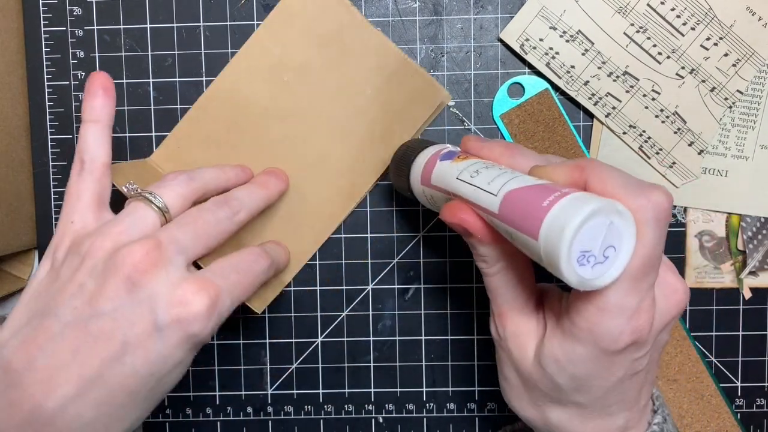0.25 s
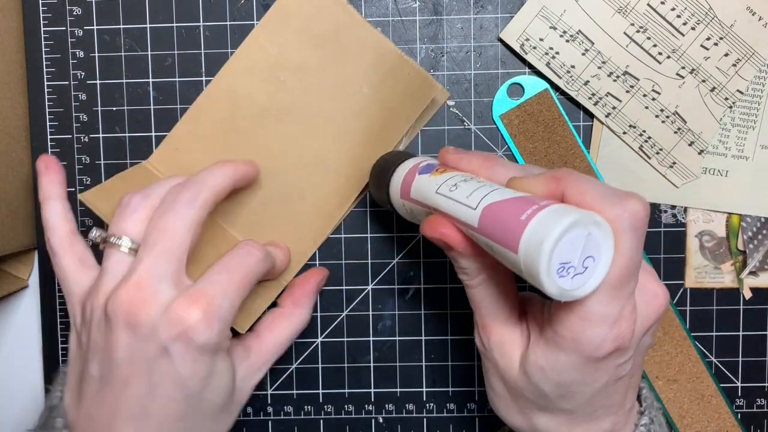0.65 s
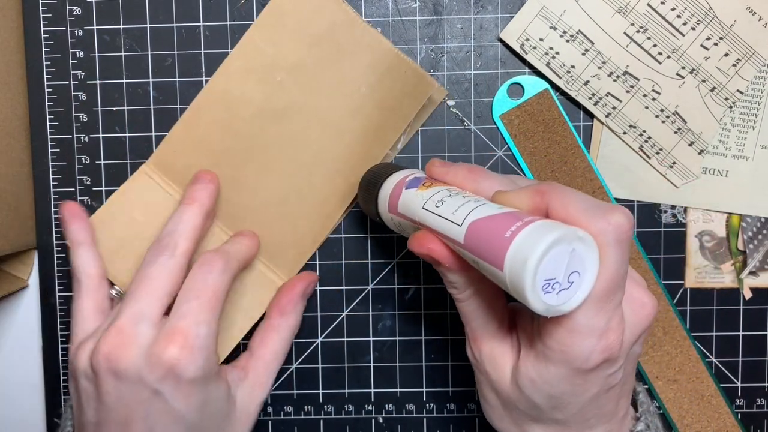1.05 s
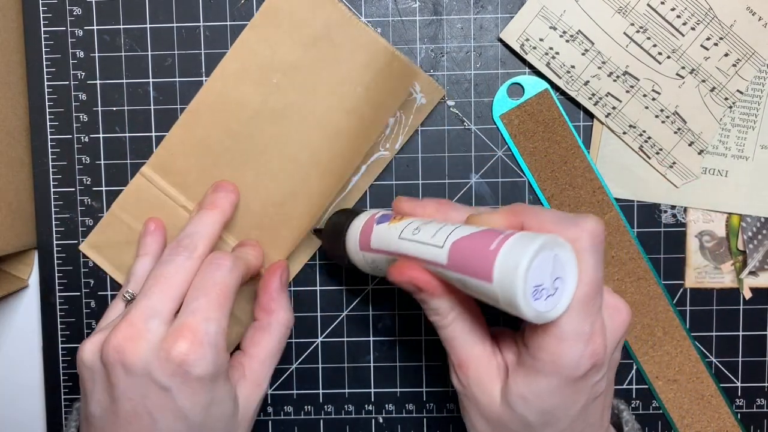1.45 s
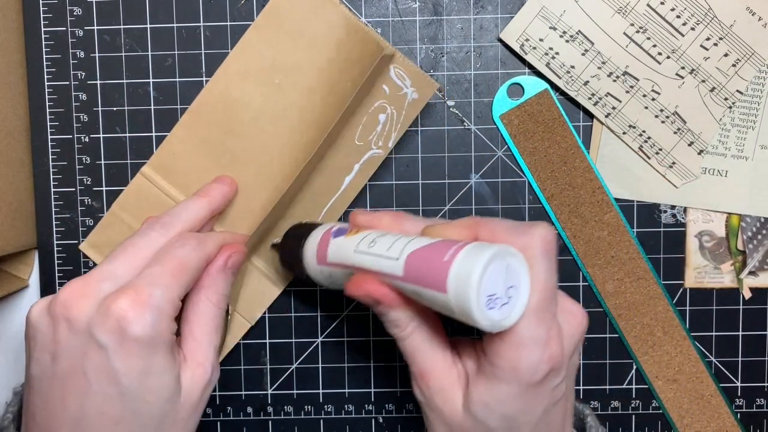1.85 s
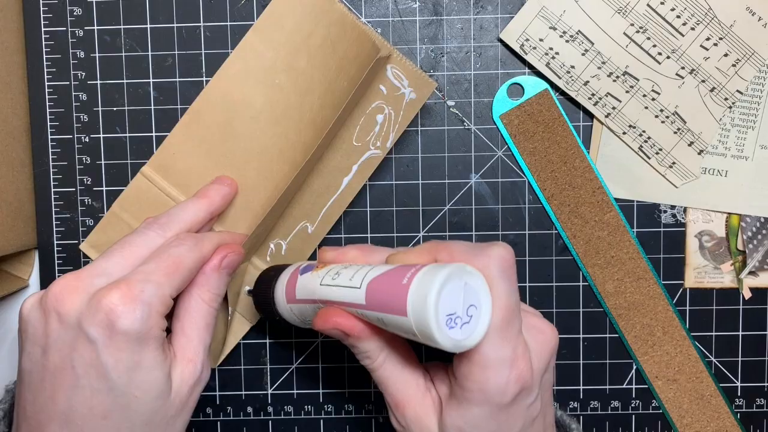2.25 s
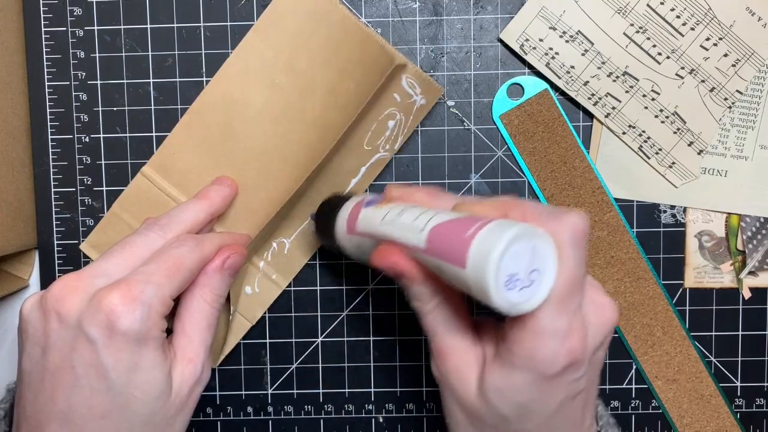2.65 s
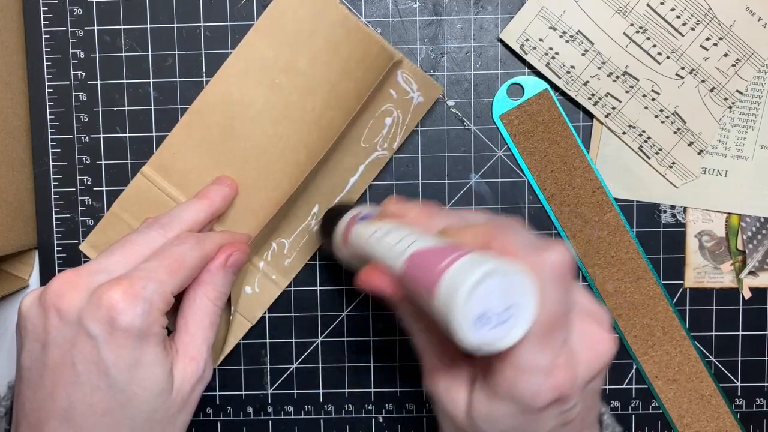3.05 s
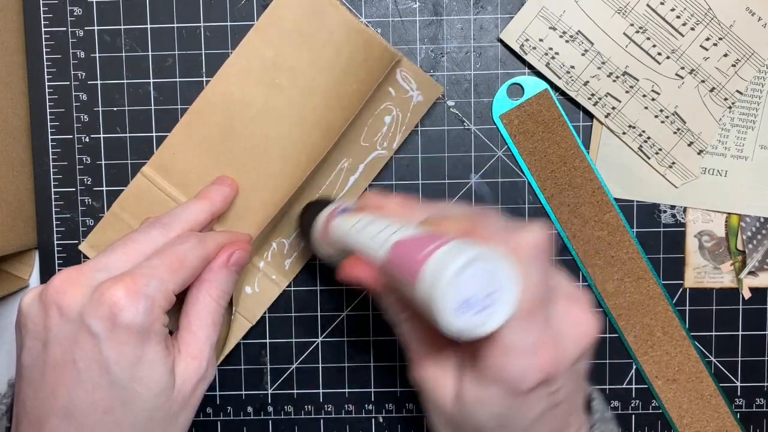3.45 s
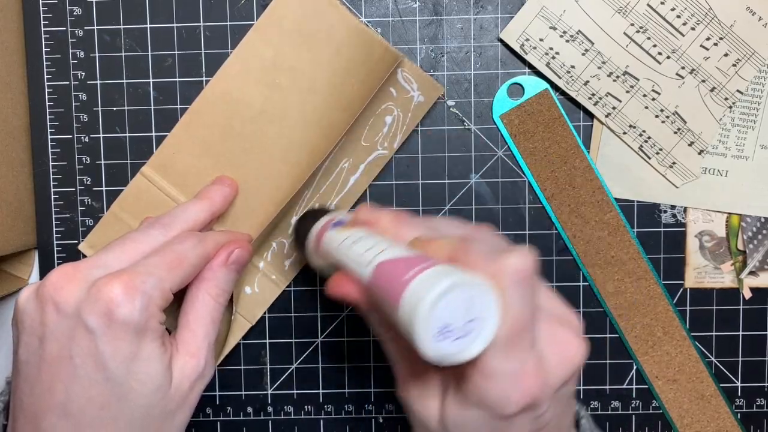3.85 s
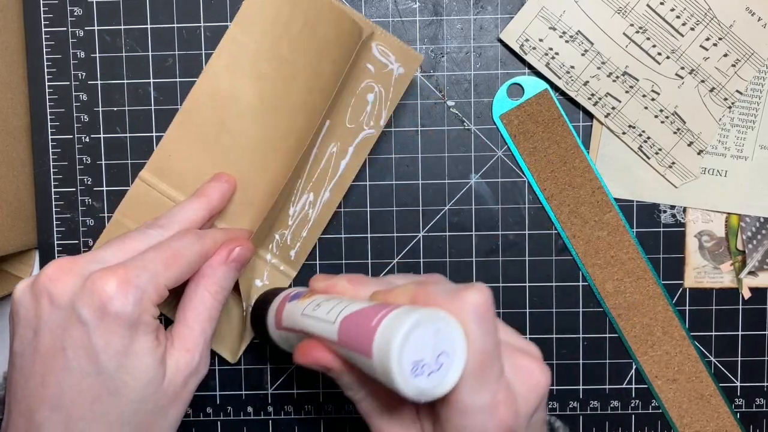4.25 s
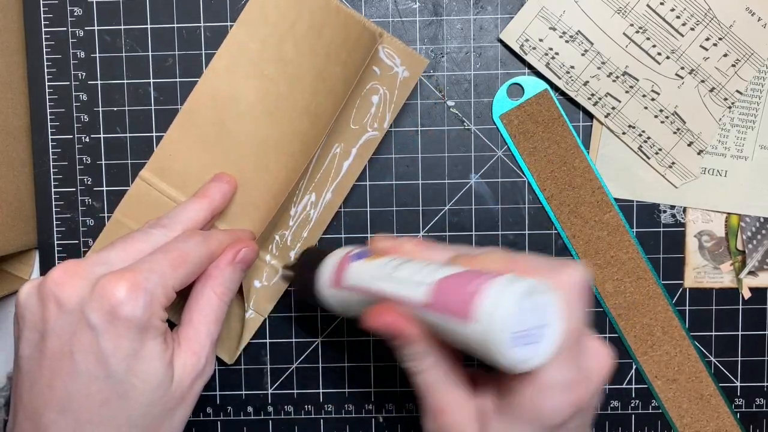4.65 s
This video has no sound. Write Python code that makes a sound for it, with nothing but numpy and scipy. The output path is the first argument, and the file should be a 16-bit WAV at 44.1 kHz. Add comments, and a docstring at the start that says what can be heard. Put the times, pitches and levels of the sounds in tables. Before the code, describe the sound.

Close, dry stereo pickup over a desk in a quiet room, with faint low rumble and slight hiss. At 0.1 s a short, bright paper swish with tiny crackles, then soft slides of a hand on a paper bag until about 1.3 s, with small creases and faint thuds near 0.6 and 0.96 s. A click at 1.4 s; at 1.65 s a sharp, bright tap with a low desk thud. Light scratchy strokes follow from 1.55 to 2.4 s. From about 2.55 s, after a soft bump, the nozzle scrubs to and fro louder, seven or eight strokes a second, grainy and mid-high, with a slight hollow bag tone. The hardest snap cracks at 3.28 s, a lesser one at 3.44 s, another duller knock at 3.93 s with a woody thud. After 4.1 s the strokes weaken, a last faint rub at 4.55 s, then room tone to about 5 s.

```python
"""At a desk in a quiet room: a glue bottle's plastic nozzle scribbles to and fro on a brown paper bag
while a hand slides and folds it. Fibres that catch and let go are random clicks that ring the sheet and
the air in the bag; creases are bursts of clicks, desk thuds decaying sines, the room shaped noise.
Two microphone ports a few centimetres apart hear it from close above."""
import sys
import numpy as np
from scipy import signal
from scipy.fft import rfft, irfft
from scipy.io import wavfile
from scipy.ndimage import uniform_filter1d

SR = 44100
rng = np.random.default_rng(int(sys.argv[2]) if len(sys.argv) > 2 else 0)


def log_audio(samples):
    """Write samples as a 16-bit WAV file to the path given in sys.argv[1]."""
    # one column per channel
    frames = np.atleast_2d(samples).T
    # limit to full scale, then quantise
    limited = np.clip(frames, -1, 1)
    pcm = np.round(limited * 32767).astype(np.int16)
    wavfile.write(sys.argv[1], SR, pcm)


N = 215798

# rings of the paper sheet: pitch_hz, width_hz, level_db (relative, before sharing out)
PAPER_RINGS = [(990, 900, -6), (1251, 700, 3.5), (1728, 220, -3.5), (2174, 392, -2.5), (2737, 615, 0.5),
               (3170, 348, 1), (3894, 1100, 3), (4400, 1800, -6)]
# rings of the air in the bag: pitch_hz, width_hz, level_db (relative, before sharing out)
BAG_RINGS = [(267, 150, -3.5), (358, 45, 0), (450, 90, -2), (590, 32, 2), (785, 55, -1), (885, 60, -1.5),
             (1030, 90, -5)]


def gain_of(db):
    """Decibels to an amplitude factor."""
    return 10 ** (np.asarray(db) / 20)


def evened(x):
    """Scales to rms 1."""
    return x / np.sqrt(np.mean(x ** 2) + 1e-20)


def read(points, hz):
    """Looks a spectrum up on a log-frequency axis."""
    f, value = np.transpose(points)
    return np.interp(np.log(hz + 1), np.log(f + 1), value)


def wander(seconds):
    """Slow random drift of rms about 1: noise at a sixteenth of the rate, smoothed twice over the given time."""
    size = round(seconds * SR / 16)
    coarse = rng.standard_normal(N // 16 + 2)
    smooth = uniform_filter1d(uniform_filter1d(coarse, size), size)
    return np.interp(np.arange(N) / 16, np.arange(len(coarse)), evened(smooth))


def room_tone():
    """Low rumble and faint hiss: two unrelated noises whose level flickers together."""
    # noise of the room: frequency_hz, level_db (per Hz)
    room_spectrum = [(20, -125), (35, -108), (55, -92), (120, -96.5), (200, -101), (300, -113), (500, -119),
                     (900, -127), (1400, -119), (3000, -124), (9000, -125), (16000, -130)]
    hz = np.fft.rfftfreq(N, 1 / SR)
    white = rfft(rng.standard_normal((2, N)))
    tone = irfft(white * gain_of(read(room_spectrum, hz)) * np.sqrt(SR / 2), N)
    return tone * gain_of(1.0 * wander(0.0346))


def strokes():
    """Each stroke speeds up and slows down along a sine arch: gains of body, fizz, sheen and boom, and the pitch."""
    # strokes of the nozzle or slides of the hand: fastest_s, speeding_up_s, slowing_down_s, friction_db,
    # fizz_db (over friction), fizz_growth_db (start to end), sheen_db (over fizz),
    # boom_db (hollow bag, over friction), sheet_pitch_hz
    stroke_rows = [ (0.002, 0.022, 0.043, -62.5, 4, -4, -0.5, -3, 2120),
                   (.075, 0.05, 0.062, -57, 2.5, -1, -4.5, 3.5, 2630),
                   (.108, 0.019, 0.086, -44.5, 6.5, -16, -5.5, -31, 3240),
                   (.2, 0.077, 0.024, -57, -3.5, 4, -0.5, 0.5, 2770),
                   (.27, 0.21, 0.076, -63, -8.5, -1, -3.5, 0, 2220),
                   (.385, 0.087, 0.051, -62, -3.5, 8, -2, -14, 2970),
                   (.46, 0.16, 0.053, -60, -2, 1, -14, -13, 2640),
                   (.54, 0.075, 0.065, -85.5, -1, 26, 4, 6.5, 2500),
                   (.592, 0.014, 0.36, -69, -1.5, -33, -8.5, -5, 2560),
                   (.715, 0.0019, 0.21, -64.5, -2, 18, 0, -11, 2960),
                   (.775, 0.095, 0.031, -59, -1.5, -6, -4, -4.5, 2920),
                   (.85, 0.024, 0.084, -65, -14, 2, -14, -10, 2960),
                   (.965, 0.036, 0.047, -64.5, -7.5, -13, 9.5, 7.5, 3040),
                   (1.07, 0.26, 0.061, -64.5, -2.5, 12, 1, -8, 2310),
                   (1.13, 0.046, 0.028, -57.5, -13, 23, 11, -14, 2370),
                   (1.2, 0.19, 0.14, -55, -8, -25, -6.5, -18.5, 2520),
                   (1.38, 0.19, 0.066, -61, -7.5, 22, -8, -16, 2280),
                   (1.49, 0.11, 0.09, -58, -17, 29, -1, -22, 2250),
                   (1.57, 0.055, 0.12, -49.5, -11.5, 12, -9, -22, 2330),
                   (1.675, 0.065, 0.052, -49.5, -3, 8, -7, 0, 2000),
                   (1.78, 0.18, 0.074, -60.5, -9.5, 0, 0, -19, 2180),
                   (1.875, 0.11, 0.066, -54.5, -10.5, 17, -7, -24.5, 2640),
                   (1.988, 0.087, 0.055, -54, -11, 21.5, -6, -22, 2530),
                   (2.062, 0.059, 0.023, -52.5, -5, -5.5, -8.5, -28.5, 3040),
                   (2.13, 0.085, 0.023, -82, -11.5, -0.5, -1.5, -11, 2700),
                   (2.215, 0.017, 0.059, -65.5, -13, 3, -2.5, -16.5, 2500),
                   (2.315, 0.072, 0.061, -53, -8.5, 7.5, -9.5, -20, 2570),
                   (2.422, 0.045, 0.072, -50.5, -4, -8, -6, -19, 2660),
                   (2.585, 0.11, 0.15, -41.5, -12, -2, -3.5, -19.5, 1970),
                   (2.785, 0.081, 0.083, -43, -7, 14, -8, -49, 2550),
                   (2.94, 0.078, 0.091, -45, -11, -9, -3, -27, 2100),
                   (2.962, 0.069, 0.05, -49.5, -4.5, 7, -10, -1.5, 1940),
                   (3.085, 0.072, 0.082, -43, -10.5, 22, -4, -27.5, 2650),
                   (3.235, 0.072, 0.15, -47.5, -3.5, -4, -4.5, -22, 2487),
                   (3.315, 0.07, 0.036, -42.5, -6, -15, -4.5, -3.5, 2270),
                   (3.436, 0.093, 0.065, -41.5, -11.5, 0, -2.5, -22.5, 2500),
                   (3.55, 0.069, 0.095, -41, -4, 10, -4.5, -18, 2450),
                   (3.705, 0.05, 0.13, -45.5, -2.5, -3, -4.5, -22.5, 2400),
                   (3.875, 0.061, 0.062, -50, -4, -10, -8, -26, 1900),
                   (3.98, 0.049, 0.033, -44.5, -7.5, 5, -2.5, 4.5, 1770),
                   (4.03, 0.035, 0.08, -49.5, -1, -22, -5, -8.5, 1700),
                   (4.118, 0.06, 0.064, -57, -8, -24, -6, -6, 2206),
                   (4.175, 0.039, 0.077, -51, -11, 23, -6.5, -18, 2400),
                   (4.278, 0.016, 0.06, -51.5, -18.5, 21, -2.5, -17.5, 2720),
                   (4.354, 0.035, 0.032, -50, -11, 0, -0.5, -16, 2450),
                   (4.4, 0.026, 0.027, -76.5, -13.5, 2, -0.5, -9, 2350),
                   (4.562, 0.024, 0.03, -57.5, -15, 0, -4, -19, 2750), ]
    settle_db, settle_s = -23.5, 0.021  # the sheet creeps on after the fastest moment and settles
    # loudness over speed: a stroke swells from a soft start and holds up longer as it slows
    swell_power, slowing_power = 2.04, 1.38
    power, t = np.zeros((4, N)), np.arange(N) / SR
    for s, rise_s, fall_s, db, fizz_db, growth_db, sheen_db, boom_db, _ in stroke_rows:
        start = max(round((s - rise_s) * SR), 0)
        span = slice(start, round((s + fall_s + 8 * settle_s) * SR))
        since = t[span] - s
        phase = np.clip(np.where(since < 0, since / rise_s, since / fall_s), -1, 1)
        speed = np.abs(np.cos(np.pi / 2 * phase))
        settling = np.exp(-np.maximum(since - fall_s, 0) / settle_s)
        creep = gain_of(settle_db) * np.where(since < 0, 0, settling)
        rub = np.maximum(speed ** np.where(since < 0, swell_power, slowing_power), creep)
        hiss_db = fizz_db + growth_db * phase / 2
        over_db = np.array([0 * phase, hiss_db, hiss_db + sheen_db, boom_db + 0 * phase])
        power[:, span] += (rub * gain_of(db + over_db)) ** 2  # overlapping strokes add in power
    centre_hz = np.interp(t, [row[0] for row in stroke_rows], [row[-1] for row in stroke_rows])
    return np.sqrt(power), centre_hz


def friction(slips_per_s=5000, spread_db=0.5, clump_db=0.5, lump_db=2.0, patchy_db=2.5, catch_db=1.5):
    """Fibres slip under the nozzle as dense random clicks of nearly equal strength, slightly clumped; the bag
    buckles in lumps."""
    gains, centre_hz = strokes()
    slips = gain_of(spread_db * np.minimum(rng.exponential(1, N), 5)) * (rng.random(N) < slips_per_s / SR)
    trains = slips * gain_of(clump_db * wander(0.006)) * rng.choice([-1., 1.], (4, N))
    trains[3] *= gain_of(lump_db * wander(.008))  # only the boom of the bag
    levelled = [evened(train) * gain for train, gain in zip(trains, gains)]
    drives = shared_out(*levelled, centre_hz, reach=0.49, air_db=-3.5, knock_db=-16.5)
    # each drive has its own patches and brief catches
    patches_db = [patchy_db * wander(0.027) + catch_db * wander(.004) for _ in drives]
    return drives * gain_of(patches_db)


def snaps(tail_db=-24, tail_s=0.015, sheen_db=-9, tear_db=6, blow=0.45):
    """A crease gives way in clicks that swell fast and die; long tears are the finest, loose fibres rustle after."""
    # snaps of paper and taps of the nozzle: start_s, level_db (before sharing out),
    # treble_db (over level), low_db (over level), pitch_hz, t60_s
    snap_rows = [(0.101, -52, 3, -7.5, 3550, 0.032), (0.116, -51, 4, 6.5, 3700, 0.0021),
                 (0.175, -42.5, -11, -10, 1500, 0.014), (0.28, -69.5, -5, 21, 2700, 0.015),
                 (.34, -69.5, 15, -22, 3300, 0.02), (0.389, -47.5, 2, -29, 1250, 0.015),
                 (0.586, -73.5, 18, -18, 3400, 0.097), (0.7096, -44, -6, -38, 3380, 0.013),
                 (0.726, -45, -12, -11, 3270, 0.0066), (0.786, -50.5, -7, -16, 1600, 0.018),
                 (0.8146, -61, 4, -26, 3500, 0.01), (0.954, -49.5, 2, 0, 3300, 0.014),
                 (1.13, -59.5, 10.5, -5, 2700, 0.057), (1.268, -50, -17, -1, 2170, .01),
                 (1.359, -50, -2, -28, 2720, 0.0086), (1.41, -24.5, -21.5, -47, 2920, 0.0045),
                 (1.4457, -40, -7, -7.5, 1810, 0.0041), (1.457, -58.5, -16, 18.5, 1720, 0.0082),
                 (1.581, -49.5, 13, -24.5, 3000, 0.0069), (1.604, -46.5, 10, -26.5, 3000, 0.0052),
                 (1.6384, -53, 15, -1, 3340, 0.026), (1.6515, -16.5, 5.5, -10.5, 2140, 0.02),
                 (1.6925, -50.5, 12, -6, 1670, 0.0066), (1.836, -52.5, 4.5, -21, 1410, 0.019),
                 (2.079, -54, -7, -24, 3140, 0.0067), (2.326, -52.5, 12.5, -38, 2730, 0.014),
                 (2.342, -40.5, -20, -17, 2260, 0.0066), (2.4056, -54.5, 15.5, -30, 3650, 0.015),
                 (2.5529, -35, 1.5, -19, 2520, 0.022), (2.735, -44.5, -2, -13, 2750, 0.017),
                 (3.038, -50, 0, -30, 2800, 0.015), (3.2819, -9.5, -0.5, -20, 2600, 0.01),
                 (3.3160, -24.5, -27, -12, 2350, 0.0019), (3.359, -42.5, -11, -5, 2300, 0.0095),
                 (3.436, -27, -7, -35, 2310, 0.019), (3.9322, -16, -12, -19, 2110, 0.0063),
                 (4, -36, -20, -23, 2130, 0.032), (4.1085, -43, 0, -8, 3500, 0.022),
                 (4.178, -51, -14, -1, 2290, 0.005), (4.2724, -50, -26, -8, 2580, 0.042),
                 (4.351, -38.5, -28, -28, 2320, 0.016), (4.609, -63, 9, -23, 2703, 0.015)]
    size = 4000  # samples a snap
    trains, t, centre_hz = np.zeros((4, N + size)), np.arange(size) / SR, np.full(N, 2500.)
    clicks = rng.standard_normal((len(snap_rows), size))
    clicks *= gain_of(1.3 * rng.standard_normal((len(snap_rows), size)))
    for (s, db, treble_db, low_db, hz, t60), click in zip(snap_rows, clicks):
        rise = 1 - np.exp(-t / (0.092 * t60))
        rustle = gain_of(tail_db) * np.exp(-t / tail_s)
        shape = rise * (gain_of(-60 * t / t60) + rustle)
        burst = click * shape
        burst /= np.sqrt(np.sum(burst ** 2) / np.sum(shape ** 2))  # as much energy as its shape
        burst[12] += blow * np.linalg.norm(shape) * 0.0096 / t60  # a short snap opens with one hard click
        top_db = treble_db + sheen_db + tear_db * np.log(t60 / 0.013)
        at = round(s * SR) - 8
        trains[:, at:at + size] += gain_of(db + np.array([[0], [treble_db], [top_db], [low_db]])) * burst
        centre_hz[at:] = hz
    # the contact lasts a moment: body and low clicks are three samples wide
    trains[[0, 3]] = uniform_filter1d(trains[[0, 3]], size=3, axis=1) * np.sqrt(3)
    return shared_out(*trains[:, :N], centre_hz, reach=0.27, air_db=-9.0, knock_db=-4)


def nearest(modes, centre_hz, reach):
    """Shares of power 1 among the rings; those near the given pitch are favoured, reach is in log frequency."""
    shares = np.array([gain_of(db) * np.exp(-.5 * (np.log(hz / centre_hz) / reach) ** 2)
                       for hz, _, db in modes])
    return shares / np.sqrt(np.sum(shares ** 2, axis=0))


def shared_out(body, treble, top, low, centre_hz, reach, air_db, knock_db):
    """Clicks for each ring of sheet and bag, the wall of the bag, then fizz and sheen."""
    # the hollow changes as the bag is pressed and opened: time_s, favoured_pitch_hz
    hollow_path = [(0, 520), (.2, 460), (.3, 574), (.45, 820), (.95, 446), (1.45, 700), (1.66, 520),
                   (2.0, 696), (2.56, 403), (2.7, 903), (2.95, 502), (3.28, 880), (3.6, 900), (3.93, 354),
                   (3.96, 520), (3.995, 600), (4.15, 525), (4.35, 798), (4.9, 600)]
    hollow_hz = np.interp(np.arange(N) / SR, *np.transpose(hollow_path))
    paper = body * nearest(PAPER_RINGS, centre_hz, reach)
    air = low * gain_of(air_db) * nearest(BAG_RINGS, hollow_hz, reach=0.74)
    return np.array([*paper, *air, low * gain_of(knock_db), treble, top])


def ring(x, hz, width):
    """A damped mode whose pitch follows the curve hz: shift to zero, smooth, shift back; white noise keeps its power."""
    turn = np.exp(2j * np.pi * np.cumsum(hz) / SR)
    r = np.exp(-np.pi * width / SR)
    return (turn * signal.lfilter([2 * np.sqrt(1 - r)], [1, -r], x * turn.conj())).imag


def tick(spectrum, size=255):
    """A short click shaped by the given spectrum, cut to start just ahead of its peak, energy 1."""
    hz = np.linspace(0, SR / 2, 257)
    level_db = np.where(hz < spectrum[0][0], -80, read(spectrum, hz))
    y = signal.firwin2(size, hz, gain_of(level_db), fs=SR)[size // 2 - 12:]
    return y / np.linalg.norm(y)


def above(x, hz):
    """A small sheet radiates little below its size: a high-pass."""
    return signal.sosfilt(signal.butter(2, hz, "high", fs=SR, output="sos"), x)


def sheet(drives, bend=0.034):
    """The clicks sound paper, bag air and bag wall, whose rings bend as the paper shifts; fizz and sheen hiss on top."""
    # fizz of the fibres: frequency_hz, level_db (relative)
    fizz_spectrum = [(3500, 3.5), (5000, -2.5), (6000, 5.5), (7500, -4), (8800, -2), (10000, -34.5),
                     (12000, -29.5)]
    # sheen of the finest fibres: frequency_hz, level_db (relative)
    sheen_spectrum = [(7500, -25), (9500, -4.5), (11000, -5.5), (13000, -8), (16000, -10.5)]
    # the whole wall of the bag, too damped to ring: pitch_hz, width_hz
    bag_wall = (600, 750)
    modes = PAPER_RINGS + BAG_RINGS + [(*bag_wall, 0)]
    # neighbouring rings have opposite signs
    rings = [(-1) ** k * ring(x, hz * (1 + bend * wander(0.21)), width)
             for k, (x, (hz, width, _)) in enumerate(zip(drives, modes))]
    hiss = sum(signal.oaconvolve(x, tick(colour))[:N]
               for x, colour in zip(drives[-2:], (fizz_spectrum, sheen_spectrum)))
    paper, bag = sum(rings[:len(PAPER_RINGS)]), sum(rings[len(PAPER_RINGS):])
    return above(paper, 770) + above(bag, 130) + above(hiss, 2000)


def scatter(x, t60=0.035):
    """Reflections off desk, hands and paper: sparse taps of random sign that die fast, energy about 1."""
    at = np.arange(30, 4000, 20) + rng.integers(0, 20, (2, 199))
    taps = np.zeros((2, 4100))
    np.put_along_axis(taps, at, rng.choice([-1., 1.], at.shape) * gain_of(-60 * at / SR / t60), 1)
    return signal.oaconvolve(x[None], taps / np.linalg.norm(taps[0]), axes=1)[:, :N]


def thuds():
    """The desk top flexes softly when the hand or bottle lands: decaying sines with a rounded onset."""
    # thuds into the desk: start_s, level_db (ahead of the soft onset), pitch_hz, t60_s
    thud_rows = [(0.619, -46.5, 66, 0.085), (0.964, -42.5, 109, 0.17), (1.657, -34, 117, .15),
                 (1.659, -44, 58.9, 0.13), (2.355, -56, 57.6, 0.14), (2.554, -43, 62, 0.096),
                 (2.561, -41, 210, 0.045), (3.284, -53, 250, 0.038), (3.933, -40.5, 267, 0.085),
                 (2.941, -44, 110, 0.049), (3.956, -48.5, 120, 0.13), (3.989, -54, 53.4, 0.31)]
    left_lag_s = .0003  # the thuds reach the left port a moment later
    out, t = np.zeros(N + 12000), np.arange(12000) / SR
    for s, db, hz, t60 in thud_rows:
        at = round(s * SR)
        onset = (1 - np.exp(-t / 0.0052)) ** 2
        out[at:at + 12000] += gain_of(db - 60 * t / t60) * np.sin(2 * np.pi * hz * t) * onset
    return np.array([np.roll(out, round(left_lag_s * SR))[:N], out[:N]])


def ports(shared, apart):
    """The right port hears the shared sound shifted in phase and only partly alike."""
    # likeness of the two ports: frequency_hz, likeness (0 to 1)
    likeness = [(60, 1), (150, 1), (350, 0.38), (700, 0.42), (1400, 0.66), (2500, 1), (4500, 1), (15000, 1)]
    # phase by which the left port leads: frequency_hz, lead_radians
    left_lead = [(0, 0), (780, -.4), (1500, 0), (2500, .95), (3450, 1.2), (4550, np.pi), (15400, 6 * np.pi),
                 (22050, 9 * np.pi)]
    # level of left over right: frequency_hz, balance_db
    balance = [(60, -0.8), (200, -1.5), (380, -2), (1200, -1.1), (2200, -1.6), (3300, 0), (15000, -0.3)]
    hz = np.fft.rfftfreq(N, 1 / SR)
    same = np.clip(read(likeness, hz), 0, 1)
    tilt = gain_of(read(balance, hz) / 2)
    a, b = rfft(shared), rfft(apart)
    mixed = same * a + np.sqrt(1 - same ** 2) * b
    right = mixed * np.exp(-1j * np.interp(hz, *np.transpose(left_lead)))
    return irfft(np.array([a * tilt, right / tilt]), N)


def scene():
    """Paper with its reflections, desk and room tone at the two ports."""
    paper = sheet(friction() + snaps())
    echoes, tone = scatter(paper), room_tone()
    close = paper + gain_of(-14) * echoes[0]
    return ports(close + tone[0], echoes[1] + tone[1]) + thuds()


def record(dry):
    """The microphone drops the deepest bass; then the band limit."""
    edge_hz = 15900
    thinned = signal.sosfilt(signal.butter(2, 40, "high", fs=SR, output="sos"), dry)
    band_limit = signal.firwin(511, edge_hz, window=("kaiser", 9), fs=SR)
    return signal.oaconvolve(thinned, band_limit[None], "same")


dry = scene()
out = record(dry)
log_audio(out)
```